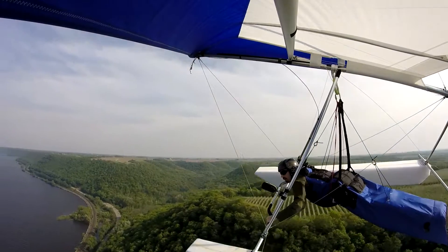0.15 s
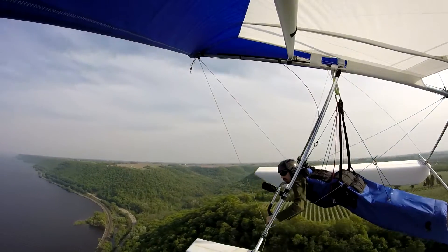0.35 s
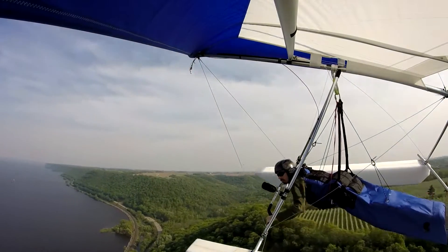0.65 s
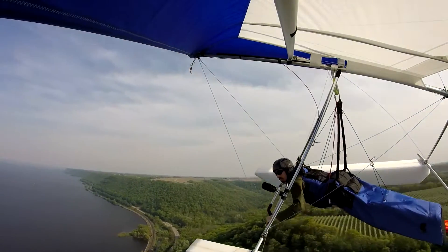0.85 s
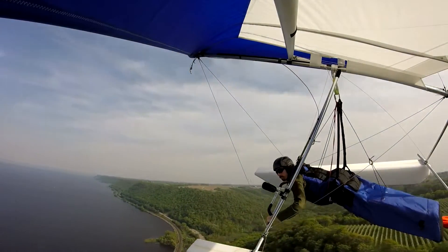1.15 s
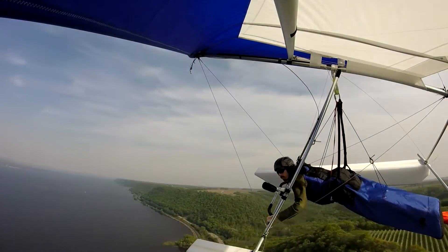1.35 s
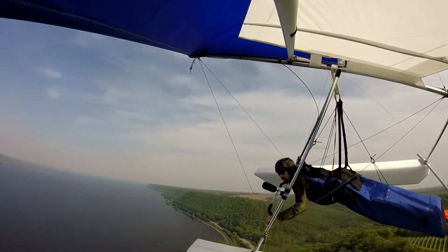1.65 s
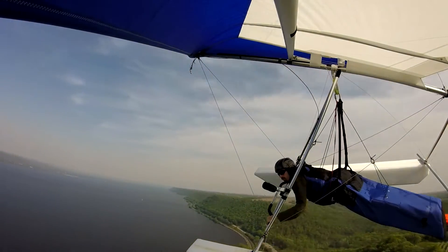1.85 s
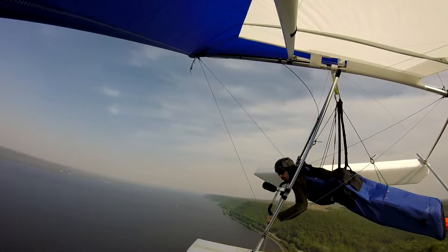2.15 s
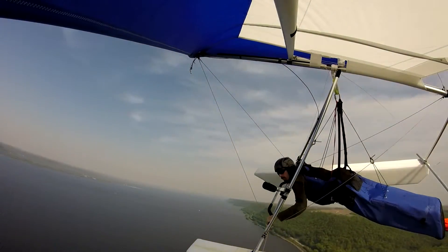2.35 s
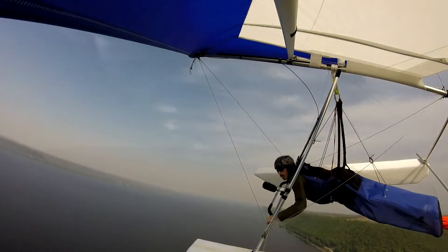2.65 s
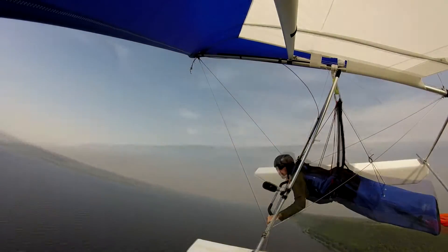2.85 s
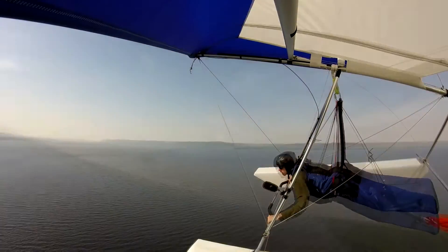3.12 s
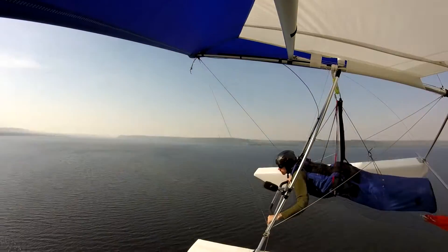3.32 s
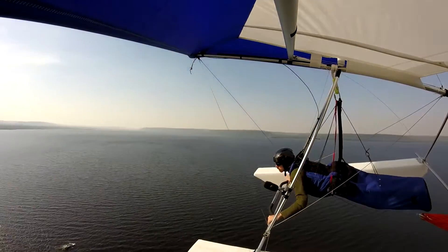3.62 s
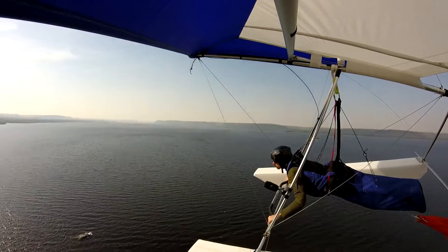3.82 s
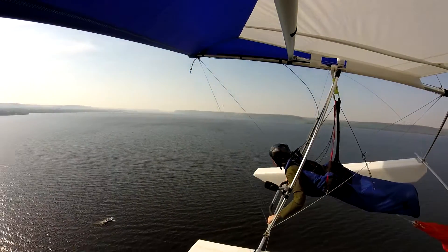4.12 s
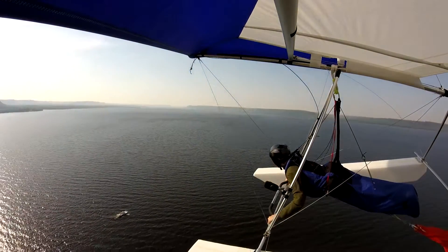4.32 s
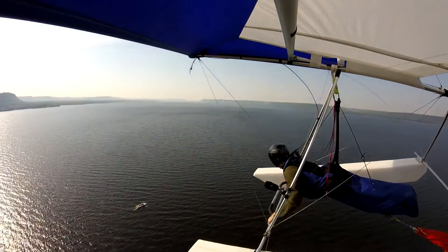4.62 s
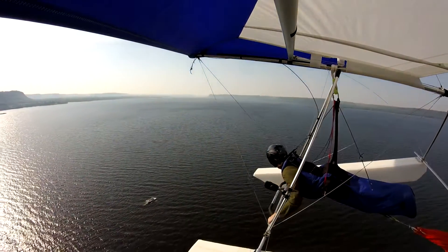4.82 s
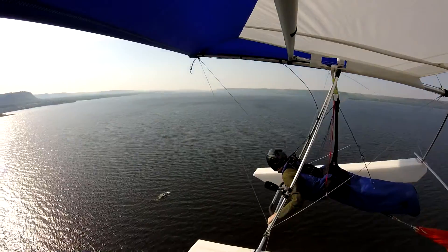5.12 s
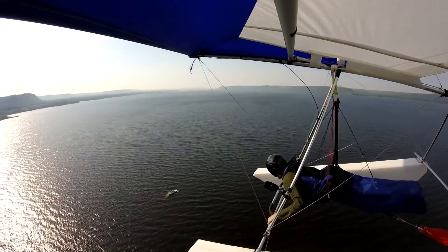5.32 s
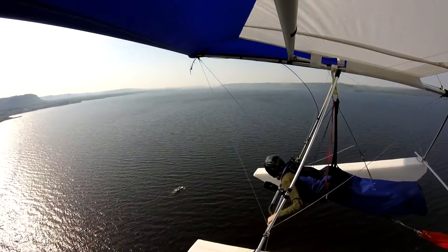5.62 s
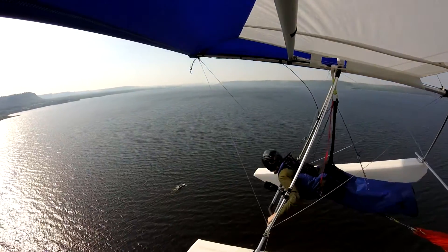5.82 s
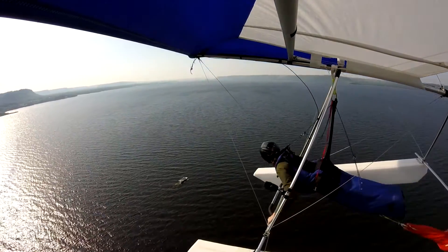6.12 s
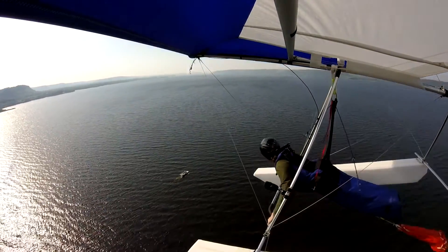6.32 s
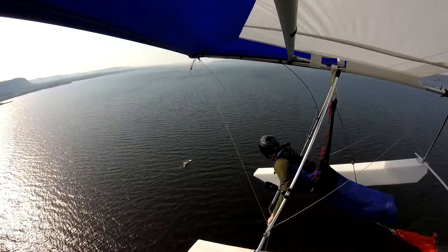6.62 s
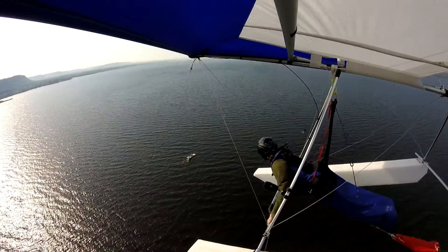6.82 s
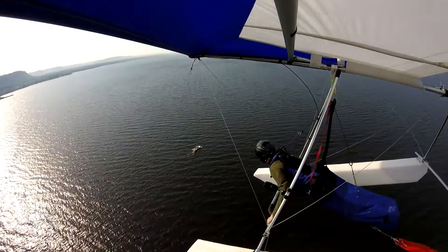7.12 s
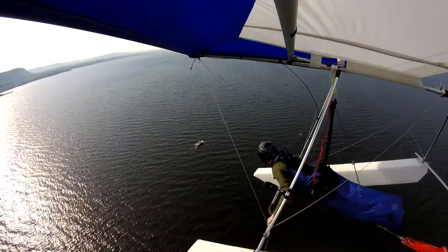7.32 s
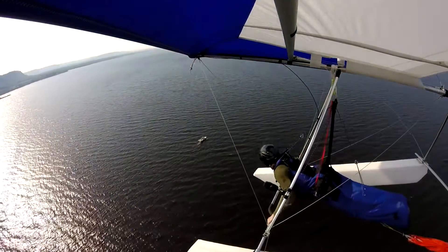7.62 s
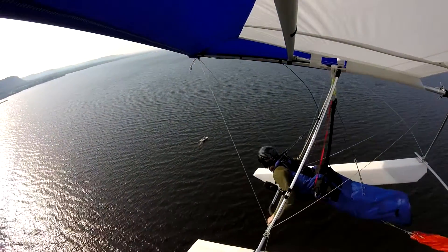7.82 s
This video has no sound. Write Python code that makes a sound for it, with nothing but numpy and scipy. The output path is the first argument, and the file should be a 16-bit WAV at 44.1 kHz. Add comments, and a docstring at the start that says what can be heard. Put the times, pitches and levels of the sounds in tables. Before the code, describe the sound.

Close on a hang glider's wing, strong wind thumps and rushes over the microphone as a loud low rumble. Thin hiss and faint breathy wire tones sit above it, with tiny ticks in the first second. Around three seconds the wires fade and a quick deep throb takes over, growing stronger and faster. Small frame knocks scatter through, and bright dry slaps and shivers of a loose edge come late.

```python
"""First a calm glide, heard from a camera on the wing of a hang glider: eddies thump and rush at its microphone
(uneven noise), air hisses past its housing, and two rigging wires sing, fading out at about 3.3 s. A small
fitting ticks in the first second; from 1.7 s the frame knocks, both as struck, ringing modes. At about 3.1 s a
throbbing wake fades in (a wavering sine); from about 3.75 s the glider speeds up in a faster run low over
water. From 5.9 s a loose edge slaps and shivers as bright bursts of noise."""
import sys
import numpy as np
from scipy import signal
from scipy.fft import rfft, irfft
from scipy.io import wavfile
from scipy.ndimage import uniform_filter1d, minimum_filter1d

SR = 44100
rng = np.random.default_rng(int(sys.argv[2]) if len(sys.argv) > 2 else 0)


def output_pcm(signal):
    """Save a mono or channel-first signal as 16-bit PCM at the path in sys.argv[1].

    Samples are clipped to [-1, 1] before scaling.
    """
    pcm = np.clip(np.atleast_2d(signal).T, -1, 1) * 32767
    wavfile.write(sys.argv[1], SR, np.round(pcm).astype(np.int16))


N = 351036


def undb(db):
    """Turn decibels into a gain."""
    return 10 ** (np.asarray(db) / 20)


def unit(x):
    """Scale to an rms of 1."""
    return x / np.sqrt(np.mean(x ** 2))


def curve(table):
    """Join the points of a (seconds, value) table by straight lines, sample by sample."""
    s, value = np.transpose(table)
    return np.interp(np.arange(N) / SR, s, value)


def swell(s, half_s):
    """A smooth rise and fall, 1 at its middle."""
    return np.exp(-((np.arange(N) / SR - s) / half_s) ** 2)


def swells(table):
    """Add up the rises and dips of a (middle s, half length s, dB) table, in dB."""
    return sum(db * swell(s, half_s) for s, half_s, db in table)


def turn(s, slow_s):
    """A smooth change from 0 to 1, halfway at s."""
    return .5 + .5 * np.tanh((np.arange(N) / SR - s) / slow_s / 2)


def wander(rate):
    """Smooth chance of spread 1 that changes about rate times a second."""
    f = np.fft.rfftfreq(N, 1 / SR)
    return unit(irfft(rfft(rng.standard_normal(N)) / (1 + (f / rate) ** 2), N))


def colour(x, spectrum):
    """Filter by a spectrum of (Hz, dB) points; white noise keeps its level."""
    hz, db = np.transpose(spectrum)
    f = np.maximum(np.fft.rfftfreq(N, 1 / SR), 1)
    gain = undb(np.interp(np.log(f), np.log(hz), db))
    return irfft(rfft(x) * unit(gain), N)


def noise(spectrum):
    """Turbulent noise with a spectrum of (Hz, dB) points and an rms of 1."""
    return unit(colour(rng.standard_normal(N), spectrum))


def narrow(hz, width):
    """A resonance fed by turbulence: a tone whose strength and phase keep changing."""
    phase = 2 * np.pi * np.cumsum(hz * np.ones(N)) / SR
    return unit(wander(width) * np.cos(phase) + wander(width) * np.sin(phase))


def ring(force, modes, pitch):
    """Damped modes driven by a force; neighbours swing in opposite senses."""
    t = np.arange(len(force)) / SR
    response = np.zeros(len(force))
    for k, (hz, db, t60) in enumerate(modes):
        decay = undb(db - 60 * t / t60)
        response += (-1) ** k * decay * np.sin(2 * np.pi * hz * pitch * t)
    return signal.fftconvolve(force, response / np.abs(response).max())[:len(force)]


# chatter of the contact, against the blow; spread of the ring's pitch from blow to blow, as a share
SCRAPE_DB, RING_SCATTER = -25.5, 0.002


def blows(events, modes, crack, rebound_s, rebound_db, crack_s, ring_db, crack_db):
    """Each blow lands, scrapes and rebounds: it rings the modes and gives a short dry crack."""
    size = 8192
    rings, envelope = np.zeros(N + size), np.zeros(N + size)
    t = np.arange(size) / SR
    # the contact does not drive the modes far into the treble
    soft = signal.butter(2, 5000, fs=SR, output="sos")
    for (s, db, bright_db), grit in zip(events, rng.standard_normal((len(events), size))):
        start, fade = int(s * SR), np.exp(-t / crack_s)
        force = undb(SCRAPE_DB) * grit * fade
        force[0] += 1
        # the last grit values also serve as chance for the rebound's delay and the pitch
        rebound = int(rebound_s * np.exp(.2 * grit[-1]) * SR)
        force[rebound] += undb(rebound_db)
        pitch = 1 + RING_SCATTER * grit[-2]
        rings[start:start + size] += undb(db) * ring(signal.sosfilt(soft, force), modes, pitch)
        envelope[start:start + size] += undb(bright_db) * fade
    cracks = colour(rng.standard_normal(N) * envelope[:N], crack)
    return undb(ring_db) * rings[:N] + undb(crack_db) * cracks


# Strength of the wind on the camera. Each row: time in seconds, strength in dB (layers follow in part).
WIND = [(0, 2.5), (.5, -0.4), (1.4, 0), (2.3, -2.5), (3.1, -2), (3.65, -4.5), (4.1, -2.5), (4.7, -1.5),
        (5.2, 0.5), (6.2, 1), (6.63, 1.7), (6.8, 1), (7.1, -0.4), (7.96, 0.9)]
# How far the air sounds like the fast run. Each row: time in seconds, share from 0 to 1.
FAST_SHARE = [(0, 0.13), (2.9, 0), (3.6, 0.1), (4.1, 0.65), (5, 0.82)]
# the glider holds its speed, then gains this share of the gliding speed each second
SPEED_UP_S, SPEED_GAIN_PER_S = 3.75, .15


def airflow():
    """Wind strength in dB, speed as a multiple of the gliding speed, and the share of the fast run."""
    wind_db = curve(WIND)
    speed = 1 + SPEED_GAIN_PER_S * np.maximum(0, np.arange(N) / SR - SPEED_UP_S)
    return wind_db, speed, np.clip(curve(FAST_SHARE), 0, 1)


def follow(law, wind_db, speed, fast):
    """Level in dB of a layer driven by the air; the fast run adds with the square of its share."""
    db, per_wind, per_speed, fast_db = law
    return db + per_wind * wind_db + per_speed * 20 * np.log10(speed) + fast_db * fast ** 2


# Colour of the big eddies' thumps. Each row: pitch in Hz, relative level in dB per Hz.
BUFFET_COLOUR = [(8, -22), (20, -3.5), (45, 1), (65, 2), (100, -2.5), (150, -5), (220, -9), (320, -16),
                 (600, -39), (1200, -73.5), (8000, -130)]
# Colour of the small eddies' rush. Each row: pitch in Hz, relative level in dB per Hz.
RUSH_COLOUR = [(100, -13.5), (250, 2), (400, -1.5), (520, -3), (630, -5), (740, -11.5), (880, -16.5),
               (1200, -20.5), (1700, -23.5), (2300, -30.5), (12000, -110)]
# Single swells and dips of the thumps. Each row: middle in seconds, half length in seconds, change in dB.
EDDIES = [(.093, 0.017, -3), (.238, 0.016, 4), (.449, 0.012, 4.5), (.605, 0.032, 4.5), (.97, 0.017, 0.5),
          (1.879, 0.012, 6), (4.118, .02, 6), (4.665, 0.073, 5.5), (5.14, 0.028, 0), (5.288, 0.015, 13),
          (5.716, .022, 3), (6.343, .018, 4), (7.683, .025, 1)]
# Single swells and dips of the rush. Each row: middle in seconds, half length in seconds, change in dB.
GUSTS = [(0.025, 0.032, 7), (.26, 0.027, 2.5), (1.11, 0.069, 2), (2.81, 0.024, 3), (3.99, 0.034, 2),
         (6.682, 0.019, 6), (6.78, .05, -2)]
# How thump and rush follow the air. In order: base level in dB, dB per dB of wind, dB per dB of speed,
# dB added at a fast share of 1.
BUFFET_LAW = (-17, 2, -0.47, 2)
RUSH_LAW = (-26, 0.99, 0.09, 0.06)


def buffeting(low_db, rush_db):
    """Large eddies thump the microphone; small ones rush, in bursts that ride on the large ones."""
    gust = wander(27)
    thump = noise(BUFFET_COLOUR) * undb(low_db + swells(EDDIES) + 0.68 * gust)
    rush = noise(RUSH_COLOUR) * undb(rush_db + swells(GUSTS) + .6 * gust + 0.5 * wander(30))
    return thump + rush


# Colour of the hiss in the glide. Each row: pitch in Hz, relative level in dB per Hz.
HISS_GLIDE = [(600, -4), (1600, -4.5), (2100, -3.5), (2350, -5), (3200, -2.5), (3900, -10), (5000, -11.5),
              (5700, -15.5), (6600, -16.5), (7200, -23), (8200, -24), (9600, -29.5), (13700, -36.5),
              (15500, -54)]
# Colour of the hiss in the fast run. Each row: pitch in Hz, relative level in dB per Hz.
HISS_FAST = [(600, -1.5), (1600, 2.5), (2300, 3.5), (2850, -3), (3700, 2), (3950, -6), (4300, -3.5),
             (5600, -9.5), (6400, -10), (7100, -23.5), (8500, -22.5), (9800, -38), (13700, -42),
             (15500, -56)]
# Resonances of the housing. Each row: pitch in Hz, width setting in Hz (scaled where it is played),
# then the level in dB within the hiss, first in the glide and then in the fast run.
HOUSING = [(1928, 170, 8, 5), (2087, 110, 6, 2), (2547, 130, -12.5, 2.5), (3217, 250, -7.5, 9.5),
           (3620, 260, -32, 2), (6030, 490, -34.5, -0.5)]
# How the hiss follows the air. In order: base level in dB, dB per dB of wind, dB per dB of speed,
# dB added at a fast share of 1.
HISS_LAW = (-60.5, 1.06, 1, 9)
HOUSING_WAVER_DB = 0.96  # each resonance swells and fades on its own


def hiss(db, fast):
    """Air grazes the housing and blows its resonances, more of them in the fast run."""
    glide_air = np.sqrt(1 - fast) * undb(11.0) * noise(HISS_GLIDE)
    fast_air = np.sqrt(fast) * undb(7.5) * noise(HISS_FAST)
    air = glide_air + fast_air
    for hz, width, glide_db, fast_db in HOUSING:
        level_db = glide_db + fast * (fast_db - glide_db) + HOUSING_WAVER_DB * wander(5)
        air = air + narrow(hz, 0.65 * width) * undb(level_db)
    flicker_db = .45 * wander(20)
    return air * undb(db + flicker_db)


# pitches at the start, and the share by which they rise each second
LOW_WIRE_HZ, HIGH_WIRE_HZ, WIRE_DRIFT_PER_S = 812.5, 1360, 0.0073
BREATH_RATIO, BREATH_DB = 1.045, -3  # a broader band just above the low wire's tone, against that tone
WIRE_DB, WIRE_PER_WIND = -45, 0.75  # the low wire's tone at 0 dB of wind; dB per dB of wind
HIGH_WIRE_DB, HIGH_WIRE_WAVER_DB = -10, 2.5  # against the low wire; it catches and loses the flow
HIGH_SWELL_S, HIGH_SWELL_HALF_S, HIGH_SWELL_DB = 1.58, 0.67, 8.1  # the high wire comes forward once
WIRES_FADE_OUT = (3.3, 0.11)  # the wires fade out: middle s, time constant s


def wires(wind_db):
    """Two rigging wires give breathy tones as wind flows past; they creep upward during the glide."""
    creep = 1 + WIRE_DRIFT_PER_S * np.arange(N) / SR
    tone = narrow(LOW_WIRE_HZ * creep, width=18)
    breath = undb(BREATH_DB) * narrow(BREATH_RATIO * LOW_WIRE_HZ * creep, width=27)
    high_db = HIGH_WIRE_DB + HIGH_SWELL_DB * swell(HIGH_SWELL_S, HIGH_SWELL_HALF_S)
    high_db = high_db + HIGH_WIRE_WAVER_DB * wander(5)
    high = narrow(HIGH_WIRE_HZ * creep, width=17) * undb(high_db)
    level = undb(WIRE_DB + WIRE_PER_WIND * wind_db)
    return (tone + breath + high) * level * (1 - turn(*WIRES_FADE_OUT))


# Ticks of a fitting. Each row: start in seconds, then ring and crack in dB (ring_db, crack_db are added).
TICKS = [(.2154, -39, -47), (.2663, -38, -49), (.2987, -39, -46), (.3441, -37.5, -38), (.3636, -36, -41),
         (.4005, -35.5, -35), (.4594, -37, -33.5), (.5077, -41, -45), (.6355, -35, -33.5),
         (.6564, -38, -45), (.7317, -35.5, -38), (.9482, -33, -33.5), (1.0286, -36.5, -39),
         (1.0625, -34.5, -37), (1.0859, -40, -43), (4.532, -42, -37)]
# How the fitting rings. Each row: pitch in Hz, relative level in dB, seconds to fade by 60 dB.
TICK_MODES = [(1384, 6.5, 0.025), (1530, 0.5, 0.028), (1960, 0, 0.064), (2150, -1.5, 0.061),
              (2625, -1, 0.052), (2834, -1.5, 0.05), (3230, -10, 0.051), (3580, -3.5, 0.036),
              (3676, -5, 0.031), (4270, -8, 0.028), (6720, -12, .018)]
# Colour of its dry crack. Each row: pitch in Hz, relative level in dB per Hz.
TICK_CRACK = [(500, -6), (1300, 5), (3500, 2.5), (4700, -5.5), (6700, -8), (7200, -15), (8500, -12),
              (10000, -22), (11300, -17.5), (12500, -31), (14000, -23), (15500, -42)]


def ticks():
    """A small fitting ticks as the load shifts: light blows on short, bright modes."""
    return blows(TICKS, TICK_MODES, TICK_CRACK, rebound_s=0.0033, rebound_db=-13,
                 crack_s=0.0048, ring_db=10.0, crack_db=-0.5)


# Knocks in the frame, from dry clacks to ringing ones.
# Each row: start in seconds, then ring and crack in dB (ring_db and crack_db are added).
KNOCKS = [(1.7375, -39, -35.5), (2.0398, -34.5, -40), (3.1364, -39, -38), (3.513, -45, -45),
          (3.5932, -43, -41), (3.6816, -37, -34.5), (3.783, -42, -43), (3.8496, -42, -34.5),
          (3.9559, -38, -37), (4.0816, -29.5, -34.5), (4.161, -39, -39), (4.5905, -30, -25),
          (5.599, -22.5, -29.5), (5.6385, -24, -36), (5.8481, -27.5, -42), (6.0596, -29.5, -42)]
# How the frame rings. Each row: pitch in Hz, relative level in dB, seconds to fade by 60 dB.
KNOCK_MODES = [(1054, -3.5, 0.04), (1545, -5.5, 0.049), (1934, 1.5, 0.09), (2013, 3.5, .04),
               (2128, 3, 0.054), (2620, -10.5, 0.041), (2870, -4.5, 0.045), (3330, -14, 0.03),
               (3630, -17, 0.023)]
# Colour of its dry crack. Each row: pitch in Hz, relative level in dB per Hz.
KNOCK_CRACK = [(400, -4), (1100, 7), (1700, 3), (2350, 0), (2750, 2.5), (3650, -5), (4100, -19),
               (6600, -17), (7200, -25), (15500, -48.5)]


def knocks():
    """The tubes of the frame knock as the load shifts: blows that ring their modes."""
    return blows(KNOCKS, KNOCK_MODES, KNOCK_CRACK, rebound_s=0.00288, rebound_db=-14,
                 crack_s=0.0044, ring_db=3.0, crack_db=-1.5)


# Surges and lulls of the wake. Each row: middle in seconds, half length in seconds, change in dB.
WAKE_SURGES = [(5.14, 0.033, 6.5), (5.36, 0.047, -10), (5.5, 0.033, 2.5), (6.86, 0.022, 1),
               (6.97, 0.048, 5), (7.07, 0.045, 5.5), (7.26, 0.042, 7), (7.38, 0.067, -6), (7.47, 0.022, 9),
               (7.68, 0.065, 6.5)]
# How the wake follows the air. In order: base level in dB, dB per dB of wind, dB per dB of speed,
# dB added at a fast share of 1.
WAKE_LAW = (-21.5, 0.84, 0.2, 6.5)
SHEDDING_HZ = 22.07  # middle pace at gliding speed
BOOM_HZ, BOOM_WIDTH_HZ, BOOM_DB = 124, 13, -14  # a low boom that rides on the wake, against its throb
WAKE_FADE_IN = (3.1, 0.11)  # the wake fades in: middle s, time constant s


def wake(db, speed):
    """Vortices peel off almost regularly, faster and harder as the glider speeds up."""
    pace_hz = SHEDDING_HZ * speed * (1 + 0.0818 * wander(25.2))
    phase = 2 * np.pi * np.cumsum(pace_hz) / SR
    throb = np.sin(phase) + undb(-15.0) * np.sin(2 * phase)
    uneven_throb = unit(throb * undb(0.98 * wander(6.4)))
    boom = undb(BOOM_DB) * narrow(BOOM_HZ, BOOM_WIDTH_HZ)
    return (uneven_throb + boom) * undb(db + swells(WAKE_SURGES)) * turn(*WAKE_FADE_IN)


# Hard slaps of the loose edge. Each row: start in seconds, level in dB.
SLAPS = [(5.89, -49), (5.9225, -40.5), (5.949, -44), (5.9766, -39.5), (6.599, -41.5), (6.623, -40),
         (6.9645, -48), (7.002, -44), (7.028, -42), (7.053, -44), (7.079, -59), (7.2245, -47),
         (7.2505, -48), (7.2768, -48), (7.327, -52), (7.3425, -54), (7.4045, -46), (7.829, -49),
         (7.869, -42)]
SLAP_S, FULL_SLAP_DB = 0.0065, -42.5  # length and level of a full slap; weaker ones are shorter


def slaps():
    """Envelope of the slaps: each jumps up, sags for milliseconds, then drops to a faint lasting rest."""
    t, envelope = np.arange(N) / SR, np.zeros(N)
    for s, db in SLAPS:
        length = SLAP_S * np.sqrt(undb(db - FULL_SLAP_DB))
        corners_s = [s - .001, s, s + length, s + length + .002]
        envelope += undb(db) * np.interp(t, corners_s, [0, 1, 0.91, 0.028])
    return envelope


# Spells in which the edge shivers. Each row: middle in seconds, half length in seconds, level in dB.
FLUTTERS = [(7.015, 0.055, -51), (7.307, 0.068, -51), (7.49, 0.034, -72), (7.623, 0.041, -54),
            (6.5, .075, -57)]
FLICKS_PER_S, FLICK_SCATTER_DB = 72, 4.5  # middle pace; spread of strength


def flicks():
    """Envelope of the shivering: quick flicks, uneven in pace and strength."""
    pace = FLICKS_PER_S * np.exp(0.4 * wander(FLICKS_PER_S))
    cycle = np.cumsum(pace) / SR % 1
    unrest = sum(undb(db) * swell(s, half_s) for s, half_s, db in FLUTTERS)
    return unrest * unit(np.exp(-cycle / .17) * undb(FLICK_SCATTER_DB * wander(FLICKS_PER_S)))


# Colour of the loose edge's rasp. Each row: pitch in Hz, relative level in dB per Hz.
SLAP_COLOUR = [(2000, -0.5), (5000, -2.5), (6000, 3), (6800, -4), (7500, -4), (9000, -7.5), (10000, -13),
               (11700, -15.5), (12300, -25), (14000, -26), (15500, -35)]


def loose_edge(grit_db):
    """The loose edge slaps and shivers, each time with a bright, gritty rasp."""
    rasp = unit(noise(SLAP_COLOUR) * undb(grit_db * wander(700)))
    return rasp * (slaps() + flicks())


def scene():
    """One airflow drives the air's layers; everything meets at the one microphone."""
    flow = wind_db, speed, fast = airflow()
    air = buffeting(follow(BUFFET_LAW, *flow), follow(RUSH_LAW, *flow))
    air = air + hiss(follow(HISS_LAW, *flow), fast) + wires(wind_db)
    rattles = ticks() + knocks()
    throb = wake(follow(WAKE_LAW, *flow), speed)
    return (air + rattles + throb + loose_edge(grit_db=1.0))[None]


TOP_HZ = 15600


def record(dry):
    """A limiter eases down the strongest peaks; everything above TOP_HZ is cut."""
    ceiling = .8
    room = np.minimum(1, ceiling / (np.abs(dry) + 1e-9))
    held = minimum_filter1d(room, size=1200)
    gain = uniform_filter1d(uniform_filter1d(held, size=600), size=600)
    top_cut = signal.ellip(8, .2, 70, TOP_HZ, fs=SR, output="sos")
    return signal.sosfilt(top_cut, dry * gain)


dry = scene()
out = record(dry)
output_pcm(out)
```